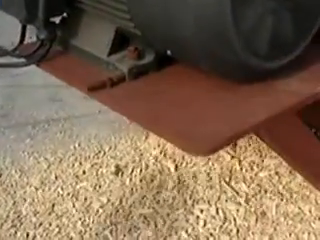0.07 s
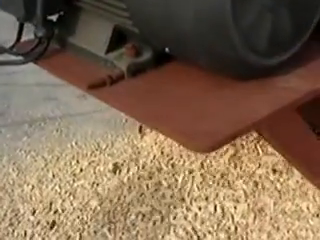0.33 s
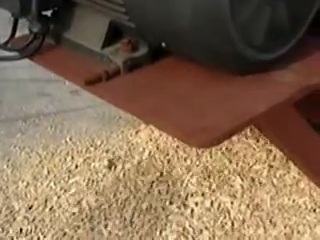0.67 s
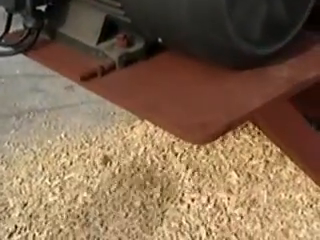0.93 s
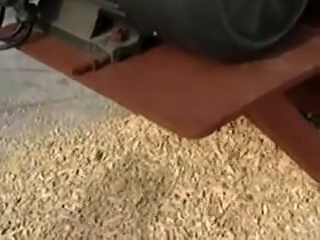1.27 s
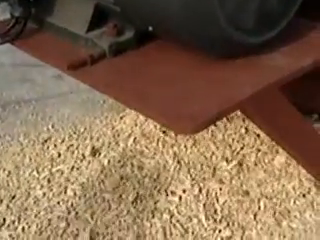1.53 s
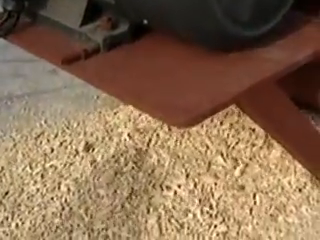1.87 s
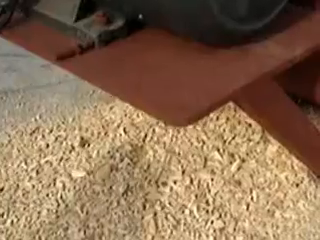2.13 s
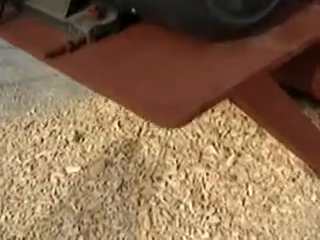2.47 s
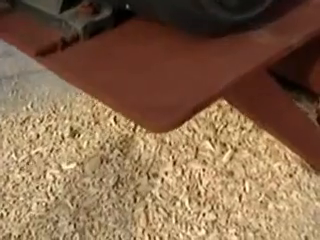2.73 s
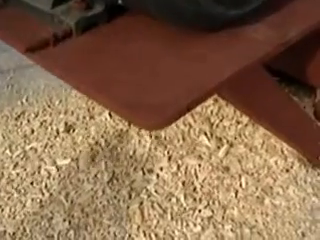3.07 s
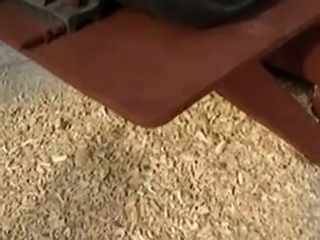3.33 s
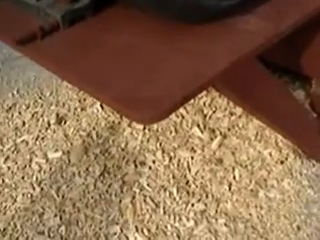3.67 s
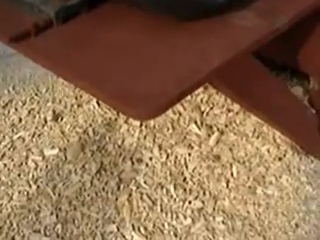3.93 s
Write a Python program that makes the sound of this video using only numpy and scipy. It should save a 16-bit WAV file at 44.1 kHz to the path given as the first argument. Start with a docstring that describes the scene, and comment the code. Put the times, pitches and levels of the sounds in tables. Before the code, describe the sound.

A wood chipper runs close up with steady rotor roar and motor hum. Its knives rapidly slice a branch for the first 0.8 seconds, ending in loud, hollow steel bangs that slightly overload the microphone. Offcuts clatter and chips rattle through the chute from about 1 to 1.7 seconds. After a brief lull, denser cracking and rattling runs from 2.2 to 3.6 seconds, then thins to the roar.

```python
"""An electric wood chipper, close up: knives slice a branch about 18 times a second and the wood
bangs in the steel hopper. Then loose offcuts clatter round the casing and showers of chips rattle
out through the chute. Underneath sits a bed of rotor roar and motor hum.
The loudest blows overload the microphone."""
import sys
import numpy as np
from scipy import signal
from scipy.fft import rfft, irfft, next_fast_len
from scipy.io import wavfile
from scipy.ndimage import map_coordinates

SR = 44100
rng = np.random.default_rng(int(sys.argv[2]) if len(sys.argv) > 2 else 0)


def put_to_file(sound):
    """Save the sound as 16-bit audio at rate SR, in the file named by the first command-line argument."""
    columns = np.atleast_2d(sound).T  # one column per channel
    safe = np.clip(columns, -1, 1)
    whole_steps = np.round(safe * 32767)
    wavfile.write(sys.argv[1], SR, whole_steps.astype(np.int16))


N = 176400

# Fader ride of the rotor's air roar: t/s, level/dB
ROAR_FADER = [(0, -22), (1.0, -26), (1.8, -25), (3.0, -26), (4, -26)]
# Tones of rotor and motor: f/Hz, level/dB
HUM_TONES = [(146, -48), (260, -43), (479, -43.5), (807, -47), (873, -45), (1039, -46.5)]
# Fader ride of the chips flying through the chute: t/s, level/dB
CHIP_FADER = [(0, -31), (.62, -32), (.7, -25.5), (.86, -24), (1.05, -23), (1.15, -16.5), (1.24, -24.5),
              (1.42, -19.5), (1.6, -21), (1.7, -26), (2.0, -29), (2.172, -24.5), (2.195, -15),
              (2.37, -18.5), (2.46, -17), (2.66, -18), (2.715, -27), (2.78, -17), (2.98, -19), (3.03, -14),
              (3.12, -17.5), (3.2, -14.5), (3.3, -19.5), (3.38, -19.5), (3.44, -25), (3.56, -19.5),
              (3.66, -28.5), (3.8, -30.5), (3.85, -27), (4, -34)]
# The branch thumping the frame: t/s, level/dB
THUMP_CUES = [(.152, -30), (.652, -18.5), (0.766, -30.5), (1.088, -32.5), (2.22, -28), (2.739, -27.5),
              (3.16, -28.5)]
# Offcuts striking the steel: t/s, rise/s, hold/s, boom/dB, crack/dB, hiss/dB
OFFCUT_CUES = [(.0, .002, 0.0049, -12, -28.5, -22), (0.6455, .0015, .035, -13.5, -15.5, -20.5),
               (0.7523, .0015, 0.025, -12, -15, -21.5), (0.833, 0.0045, 0.026, -17.5, -28, -24),
               (1.081, .001, 0.013, -15, -19.5, -26.5), (1.088, 0.0061, 0.018, -30, -17, -20),
               (1.241, 0.0068, 0.014, -19.5, -23.5, -15.5), (1.303, .0015, 0.005, -8.5, -15.5, -19.5),
               (1.314, .002, 0.023, -12.5, -27, -38.5), (1.357, 0.0019, 0.022, -16, -18.5, -30.5),
               (1.451, .008, 0.01, -35.5, -21.5, -20), (1.532, .004, 0.028, -32, -21, -24.5),
               (1.63, .004, 0.0086, -35.5, -31, -24.5), (2.1802, .0015, 0.0082, -12.5, -12.5, -20.5),
               (2.223, 0.0078, 0.054, -26, -21, -25), (2.393, 0.014, 0.026, -29.5, -15, -22),
               (2.454, 0.0059, 0.0038, -13, -12, -31.5), (2.495, 0.012, 0.044, -22.5, -15, -28.5),
               (2.556, .006, 0.02, -16.5, -21, -21), (2.619, 0.0024, .015, -16.5, -17, -21.5),
               (2.666, .004, .02, -19, -17, -21.5), (2.729, 0.0022, 0.044, -21.5, -12, -22),
               (2.838, .006, 0.017, -21, -22, -25.5), (2.893, .004, 0.02, -24, -23.5, -21.5),
               (3.135, 0.0031, 0.039, -17, -21, -44.5), (3.171, 0.0059, .025, -25, -19.5, -49),
               (3.453, 0.0014, 0.0025, -37, -19.5, -20.5), (3.495, .0015, 0.037, -28.5, -22, -21)]
# Knife strokes in playing order: hiss/dB, boom/dB
KNIFE_STROKES = [(-23.5, -15.5), (-23.5, -31.5), (-20.5, -20.5), (-22.5, -33.5), (-18.5, -27), (-18, -32.5),
                 (-19, -35), (-21, -22.5), (-18.5, -26.5), (-21.5, -28), (-17, -19), (-20.5, -21),
                 (-15, -11), (-25, -28), (-19.5, -8.5)]

# EQ of the rotor's air roar, broad in the mids: f/Hz, level/dB
ROAR_EQ = [(20, -18), (45, -21.5), (90, -15.5), (120, -12.5), (190, -6.5), (250, -3.5), (310, -6),
           (440, -4), (610, -7), (820, -3), (1050, -6), (1320, -12), (2000, -13.5), (3000, -11.5),
           (5000, -15.5), (7500, -20)]
# EQ of chips pelting the chute: f/Hz, level/dB
CHUTE_EQ = [(100, -19.5), (220, -11), (310, -10), (450, -7), (900, -1), (1250, -4.5), (1700, 0),
            (2080, 0.5), (2650, -3), (3100, -4.5), (4200, -7), (5500, -10), (7600, -20)]
# EQ of the frame's dull thump: f/Hz, level/dB
THUMP_EQ = [(30, -21), (80, -12.5), (130, -15.5), (190, 0), (260, 0.5), (400, -5.5), (900, -33.5),
            (3000, -61)]
# EQ of the hopper's hollow boom: f/Hz, level/dB
BOOM_EQ = [(30, -37.5), (90, -28), (190, -12.5), (310, -12.5), (430, -1.5), (520, 1), (680, 2), (860, 0),
           (1100, -13.5), (2000, -17), (5000, -42)]
# EQ of cracking wood: f/Hz, level/dB
CRACK_EQ = [(120, -47.5), (400, 2.5), (900, 0.5), (1300, -1.5), (2000, 0), (3000, -3), (4000, -8.5),
            (5500, -29), (7600, -19)]
# EQ of the bright slicing hiss: f/Hz, level/dB
HISS_EQ = [(300, -24), (1200, -11.5), (2500, -6.5), (3700, 2), (5200, 2), (6500, 0), (7600, -4)]
# Ringing modes of the casing plates: f/Hz, level/dB, t60/s
PLATE_MODES = [(918, -9.5, 0.43), (1043, -4.5, 0.079), (1520, 1, 0.09), (1876, -9, .06), (2028, -4, 0.11),
               (2188, -2, 0.05), (2347, -4.5, 0.023), (3690, -1, .08), (5080, 2, 0.034)]
# Ringing modes of the steel hopper: f/Hz, level/dB, t60/s
HOPPER_MODES = [(225, -13.5, 0.27), (257, -9.5, .3), (391.6, -9.5, 0.6), (488, -3.5, 0.089),
                (556.7, -5.5, 0.2), (705, -1, 0.32), (769, -5, 0.19), (870, 3, 0.93), (950, -14.5, 0.24)]

CUT_HZ, FIRST_CUT_S = 18.2, .0375  # knife strokes a second, time of the first
TOP_HZ = 7720  # the microphone's band limit


def amp(db):
    """Decibels to gain."""
    return 10 ** (np.asarray(db) / 20)


def unit(x):
    """Scale to rms 1."""
    return x / np.sqrt(np.mean(x ** 2) + 1e-20)


def curve(rows):
    """Join (t/s, value) points into one value per sample."""
    return np.interp(np.arange(N) / SR, *np.transpose(rows))


def wobble(rate):
    """Smooth random modulation, rate knots a second."""
    return map_coordinates(rng.standard_normal(int(N * rate / SR) + 4), [np.arange(N) * rate / SR])


def eq(x, points):
    """Causal EQ through (f/Hz, level/dB) points, scaled to unit power gain."""
    m = 2 * next_fast_len(N)
    freqs = np.fft.rfftfreq(m, 1 / SR)
    hz, db = np.transpose(points)
    gain = amp(np.interp(np.log(freqs + 1), np.log(hz + 1), db))
    gain /= np.sqrt(np.mean(gain ** 2 * (freqs < TOP_HZ)))
    cepstrum = irfft(np.log(gain))
    cepstrum[1:m // 2] *= 2  # minimum phase: no ringing ahead of an attack
    cepstrum[m // 2 + 1:] = 0
    return irfft(rfft(x, m) * np.exp(rfft(cepstrum)))[:N]


def impacts(per_s, spread_db):
    """A crackle of tiny random impacts, rms 1."""
    size = amp(spread_db * np.clip(rng.standard_normal(N), -2, 2)) * rng.choice([-1, 1], N)
    return unit(size * (rng.random(N) < per_s / SR))


def burst(start, rise, hold, t60):
    """Envelope of one blow: rise, hold, decay, all in seconds."""
    t = np.arange(N) / SR - start
    return np.clip(t / rise, 0, 1) * np.exp(-np.log(1000) * np.clip((t - rise - hold) / t60, 0, 2))


def scatter(x, t60):
    """Smear each impact into a diffuse tail of equal energy."""
    decay = amp(-120 * np.arange(SR // 4) / SR / t60)
    power = signal.fftconvolve(x ** 2, decay / decay.sum())[:N]
    return np.sqrt(np.abs(power)) * rng.standard_normal(N)


def ring(x, modes):
    """Steel modes ringing in answer to x, at the level of x."""
    t = np.arange(SR // 2) / SR
    response = 0
    for hz, db, t60 in modes:
        envelope = amp(db) / np.sqrt(t60) * np.exp(-np.log(1000) * t / t60)
        response += envelope * np.sin(2 * np.pi * (hz * t + rng.random()))
    return unit(signal.fftconvolve(x, response)[:N]) * np.std(x)


def blend(direct, wet, wet_db):
    """Mix in a wet signal and trim for the added power."""
    return (direct + amp(wet_db) * wet) / np.hypot(1, amp(wet_db))


def casing(hits, eq_points, plate_db=-10.5):
    """Impacts in the casing: dense short reflections between the walls, and the plates' ring."""
    reflections = scatter(hits, t60=.059)
    body = eq(blend(hits, reflections, wet_db=.5), eq_points)
    return body + amp(plate_db) * ring(body, PLATE_MODES)


def rotor(pulse_db=1.16, throb_hz=30.5, throb_db=-47.5):
    """The bed: air roar pulsing with the knives, wavering rotor and motor hum, the frame's throb."""
    t = np.arange(N) / SR
    pulse = np.cos(2 * np.pi * CUT_HZ * (t - FIRST_CUT_S))
    roar = amp(curve(ROAR_FADER) + pulse_db * pulse) * eq(rng.standard_normal(N), ROAR_EQ)
    hum = 0
    for hz, db in HUM_TONES:
        wavering_gain = amp(db - 1.5 * wobble(4))
        phase_drift = .75 * wobble(8)
        hum += wavering_gain * np.sin(2 * np.pi * hz * t + phase_drift)
    throb = amp(throb_db) * np.sin(2 * np.pi * throb_hz * t)
    return roar + np.sqrt(2) * (hum + throb)


def chips(flutter_db=1.08, clack_db=-14.5):
    """Showers of chips pelt the chute; larger ones clack singly."""
    flow = amp(curve(CHIP_FADER) + flutter_db * wobble(45))
    shower = casing(flow * impacts(per_s=2200, spread_db=3), CHUTE_EQ)
    large_chips = flow * impacts(per_s=30, spread_db=.5)
    clacks = eq(scatter(large_chips, t60=.083), CRACK_EQ)
    return shower + amp(clack_db) * clacks


def thumps():
    """Low-end weight: dull shocks of the branch against the frame."""
    force = sum(amp(db) * burst(start, rise=.0093, hold=.023, t60=.36) for start, db in THUMP_CUES)
    return eq(force * rng.standard_normal(N), THUMP_EQ)


def blow(start, rise, hold, boom_db, crack_db, hiss_db, hiss_t60):
    """Power envelopes of one blow on wood: boom, crack and hiss."""
    boom = amp(boom_db) * burst(start, rise, hold, t60=.086)
    rumble = amp(boom_db - 7.5) * burst(start, rise, hold, t60=1)  # the hopper's long tail
    crack = amp(crack_db) * burst(start, rise, hold, t60=.17)
    smack = amp(crack_db + 3) * burst(start, rise, hold=0, t60=.09)  # first contact
    hiss = amp(hiss_db) * burst(start, rise, hold, hiss_t60)
    return np.array([boom ** 2 + rumble ** 2, crack ** 2 + smack ** 2, hiss ** 2])


def offcuts():
    """Power envelopes of loose offcuts striking the steel."""
    return sum(blow(*cue, hiss_t60=.12) for cue in OFFCUT_CUES)


def knives(rise_s=.003, hold_s=.007):
    """Power envelopes of the evenly spaced knife strokes through the branch."""
    power = np.zeros((3, N))
    for k, (hiss_db, boom_db) in enumerate(KNIFE_STROKES):
        start = FIRST_CUT_S + k / CUT_HZ
        crack_db = max(boom_db, hiss_db) - 6  # splintering follows the louder of bang and slice
        power += blow(start, rise_s, hold_s, boom_db, crack_db, hiss_db, hiss_t60=.075)
    return power


def chopping(power):
    """Voice the blows' envelopes: the hopper booms and rings, wood splinters, parting fibres hiss."""
    boom, crack, hiss = np.sqrt(power)
    hopper = eq(boom * impacts(per_s=2500, spread_db=1.5), BOOM_EQ)
    splinters = casing(crack * impacts(per_s=5400, spread_db=2.5), CRACK_EQ)
    slicing = eq(hiss * impacts(per_s=16000, spread_db=0), HISS_EQ)
    return blend(hopper, ring(hopper, HOPPER_MODES), wet_db=-6) + splinters + slicing


def scene():
    """The whole machine, panned dead centre."""
    mix = chopping(knives() + offcuts()) + thumps() + chips() + rotor()
    return np.tile(mix, (2, 1))


def record(dry):
    """The microphone soft-clips the highest peaks and cuts the treble above its band limit."""
    clipped = dry / (1 + np.abs(dry) ** 10) ** (1 / 10)
    m = next_fast_len(N + SR // 2)
    passband = np.clip((TOP_HZ - np.fft.rfftfreq(m, 1 / SR)) / 240 + .5, 0, 1) ** 2  # 240 Hz wide edge
    return irfft(rfft(clipped, m) * passband, m)[:, :N]


dry = scene()
out = record(dry)
put_to_file(out)
```